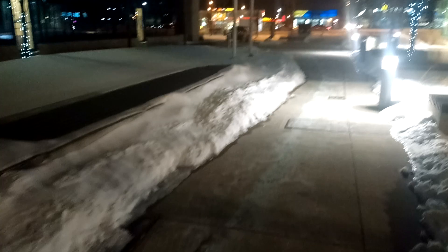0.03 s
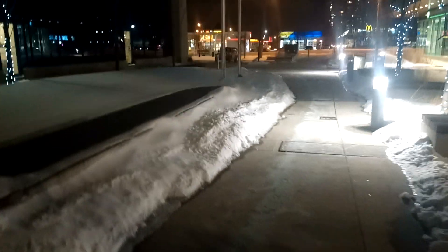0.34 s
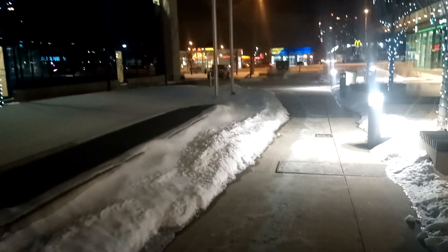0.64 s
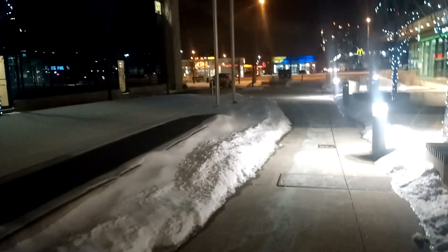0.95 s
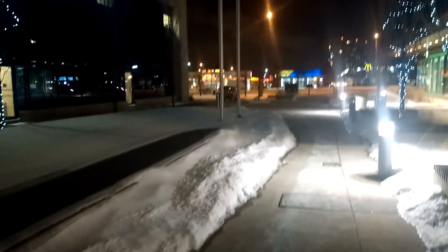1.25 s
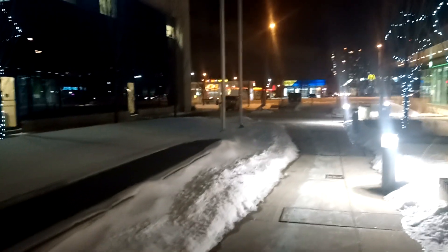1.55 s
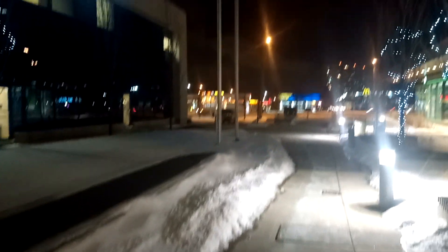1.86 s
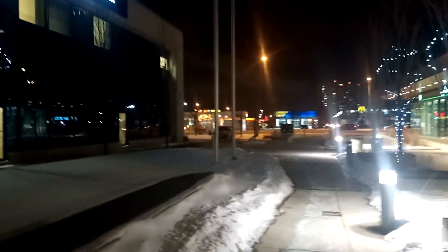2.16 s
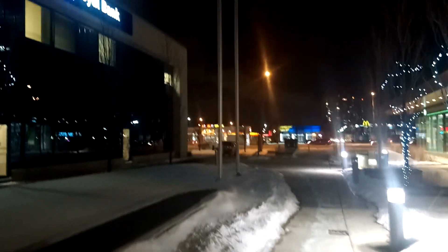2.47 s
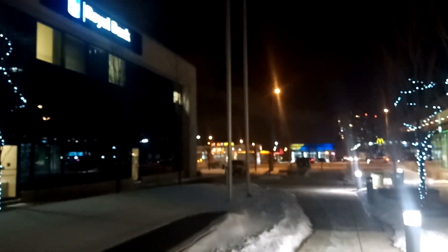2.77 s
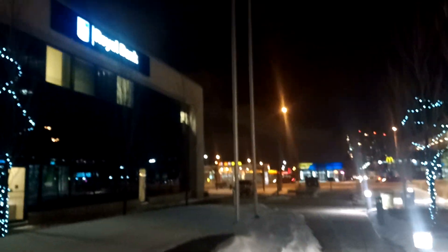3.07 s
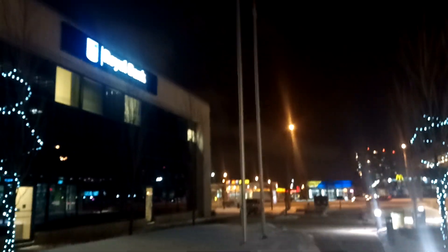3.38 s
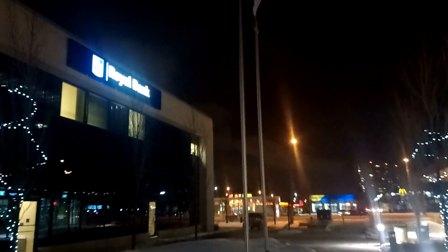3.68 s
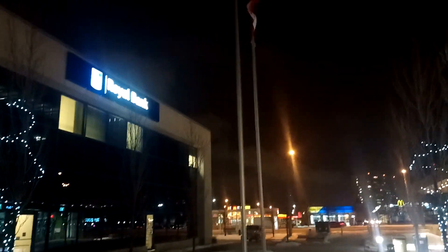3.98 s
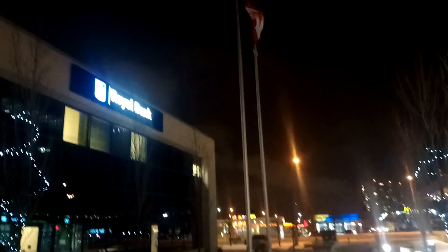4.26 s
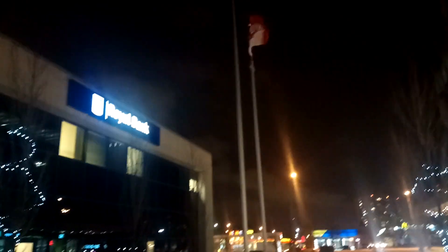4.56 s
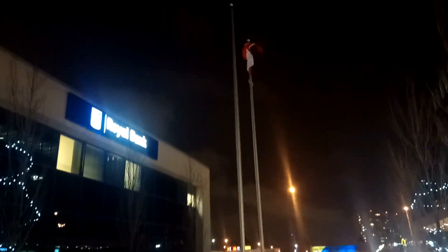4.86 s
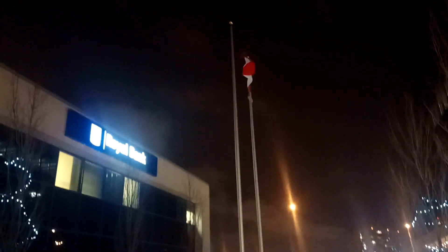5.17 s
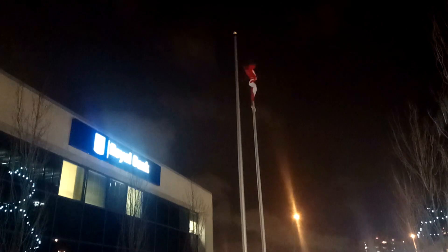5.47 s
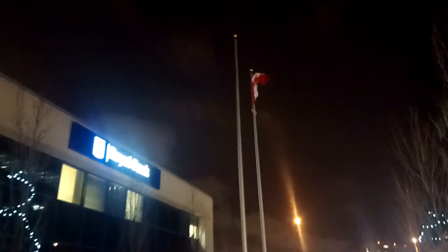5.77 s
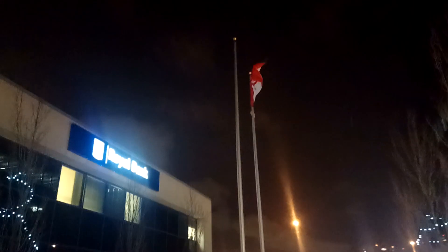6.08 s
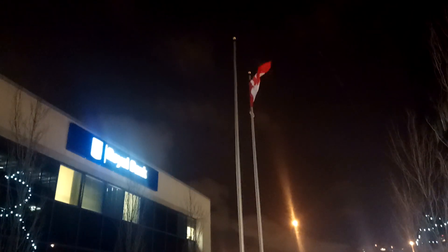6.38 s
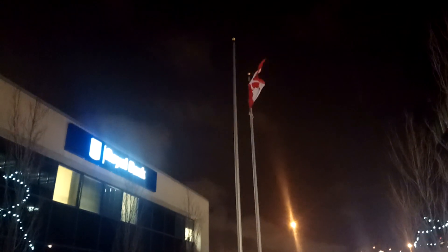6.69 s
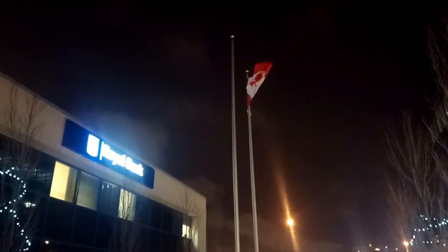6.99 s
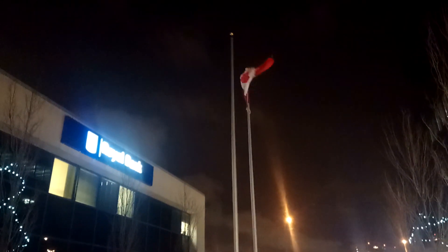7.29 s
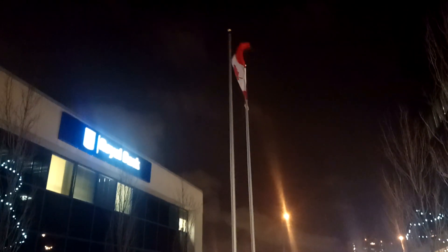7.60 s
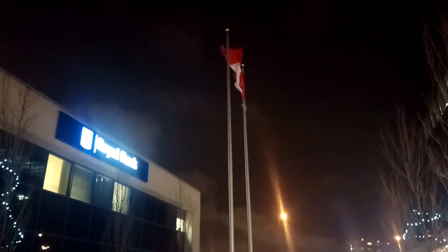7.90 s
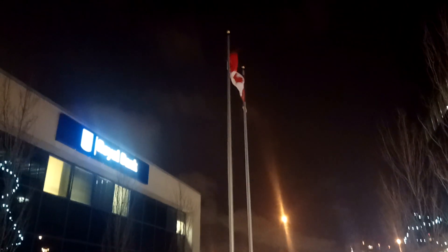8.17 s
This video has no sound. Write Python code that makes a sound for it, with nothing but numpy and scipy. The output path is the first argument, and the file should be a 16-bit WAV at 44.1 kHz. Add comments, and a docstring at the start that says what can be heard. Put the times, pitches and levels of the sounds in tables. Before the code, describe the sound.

A rope slaps rapidly against a hollow metal flagpole with springy clangs, while wind gusts rumble on the microphone over faint traffic.

```python
"""Halyard on a flagpole

On a windy night in a town square, a rope whips a hollow metal pole, swinging almost seven times a second.
It slaps going out and coming back; each slap rasps and sends a short, springy clang along the tube.
Gusts buffet the microphone over distant traffic, a faint whine, one footstep and two stray knocks."""
import sys
import numpy as np
from scipy import signal
from scipy.fft import rfft, irfft, next_fast_len
from scipy.io import wavfile

SR = 44100
rng = np.random.default_rng(int(sys.argv[2]) if len(sys.argv) > 2 else 0)


def wav_record(signal):
    """Record a signal, one row per channel, as 16-bit PCM in the file named by sys.argv[1]."""
    frames = np.transpose(np.atleast_2d(signal))
    bounded = np.clip(frames, -1, 1)
    # unit amplitude maps onto the largest positive 16-bit level
    quanta = np.round(bounded * 32767).astype(np.int16)
    wavfile.write(sys.argv[1], SR, quanta)


N = 372204
TIME = np.arange(N) / SR
FIRST_RETURN_S, SWING_S, RETURN_JITTER_S = .168, .14696, .0006   # the taut rope keeps its own beat
TRAVEL_HZ, BENDING_HZ = 2507, (1504.3, 2963)   # pitch that travel_s refers to; range where speed varies
DETOUR_S, DETOUR_STEP_HZ = .0024, 351   # fittings hurry or hold back each narrow band of the wave

# swings of the rope: start_s, outward_db, return_db
ROPE_SWINGS = [(0.074, 4.5, -2.5), (0.223, 2, 0), (0.37, 2, -0.5), (0.518, 1.5, 3.5), (0.666, 5, 4.5),
               (0.811, 4.5, 4), (0.957, 5.5, 1), (1.104, 4.5, 2.5), (1.25, 5, 3), (1.399, 5, 3),
               (1.546, 3, 5), (1.692, 3.5, 0.5), (1.838, 3.5, -8), (1.985, 6, 0.5), (2.132, 3, 3),
               (2.28, -2.5, 0.5), (2.424, 3, -4), (2.573, -3.5, 2), (2.721, -2, 6), (2.866, 0.5, -2),
               (3.012, -3, -1), (3.16, -2, -4.5), (3.307, -3.5, -7), (3.454, -10, -12), (3.598, -4, -9),
               (3.746, -2.5, -4.5), (3.893, 0, 2.5), (4.04, -2.5, -2.5), (4.189, -2.5, -2.5),
               (4.335, 0.5, 1), (4.482, -4, 0), (4.628, 1.5, 1), (4.777, 4, -7.5), (4.921, -2, -13.5),
               (5.071, 0, 0), (5.218, 3.0, -1), (5.366, -0.5, -5), (5.513, -0.5, 1), (5.659, 1.5, -1),
               (5.806, 2, 0), (5.953, 1.5, 0.5), (6.102, 3, 0.5), (6.248, 2.5, 2.5), (6.397, -1, -25),
               (6.543, 4, 1), (6.692, 5.5, 0.5), (6.837, -2, 2), (6.984, 3, 3.0), (7.131, -3, 1),
               (7.278, -4, 1), (7.426, 4, 0.5), (7.573, 3, -1.5), (7.719, 1.0, 0), (7.865, -5, 1.5),
               (8.014, -5, 2), (8.16, -2.5, 1.5), (8.309, 2, 0)]
# at first the rope comes back a little early: time_s, lead_s
EARLY_RETURN = [(2, .004), (4.5, 0)]
# touches within one slap: offset_s, level_db
SLAP_TOUCHES = [(0, 0.5), (.0044, -4), (0.013, -18), (.032, -10.5)]
# envelopes of the rope laying itself along the pole, out and back: offset_s, level_db
OUT_RASP_SHAPE = [(0, 2), (.01, -0.5), (0.017, 1), (0.036, -5), (.049, 0), (.062, -10), (0.087, -10.5)]
BACK_RASP_SHAPE = [(0, -0.5), (0.022, -9), (.034, -8.5), (0.041, -4), (.058, -5.5), (0.079, -24)]
# envelope of the bright first contact: offset_s, level_db
JINGLE_SHAPE = [(0, -10), (.003, -1), (0.012, -11.5), (0.041, -14)]
# ringing modes of the pole: pitch_hz, level_db, t60_s
POLE_MODES = [(1040, -7, .2), (1431, -6.5, .26), (1572, -10, .2), (1707, -9, .18), (1847, -2.5, .12),
              (1972, -4, .2), (2259, -4, .15), (2302, -2, .18), (2447, -4, .1), (2672, -3, .12),
              (3241, -6, .06), (4130, -6, .05), (5458, -15, .3)]
# short resonances where the rope lands, on every slap and on the return alone: pitch_hz, level_db, t60_s
CLINK_MODES = [(2412, -3.5, 0.06), (3150, -18, 0.028), (4170, -20, 0.03), (5600, -12, 0.041),
               (6470, -19, 0.033)]
RETURN_MODES = [(1280, -14, .012), (1950, -3, 0.014), (2450, 0, .012), (3200, -4, .006), (4250, 1, 0.0045),
                (6450, -12, .012)]
# EQ of the far clang, the near clang and the rasp: pitch_hz, gain_db
FAR_CLANG_EQ = [(500, -25), (1100, -7), (1450, -7), (1850, -1.5), (2300, 2), (2750, -2), (3400, -13),
                (4200, -10), (5000, -24), (6500, -28), (9000, -46)]
NEAR_CLANG_EQ = [(500, -17), (1500, -15.5), (1950, -2), (2400, 5.5), (2750, -3.5), (3400, -7), (4200, -9),
                 (5000, -17), (6500, -25), (9000, -49.5)]
RASP_EQ = [(400, 1.5), (1200, -5), (2300, 0.5), (3000, 4), (4200, 5), (5300, -1), (6600, 3), (7600, -7.5),
           (9500, -21), (12000, -47.5), (13700, -56.5), (15000, -23.5), (16000, -51)]
# echoes off the ground and a facade: delay_s, level_db, right_lag_s
ECHOES = [(.0023, -13, 0.00039), (0.02, -4.5, .00043)]
# wind at the microphone: time_s, level_db
WIND_LEVEL = [(0, -40), (1.45, -42), (1.85, -25.5), (2.2, -18), (2.6, -13), (3.3, -12), (4.7, -16),
              (5.3, -15), (6.5, -17.5), (7.1, -25), (7.6, -50), (8.44, -43)]
# single gusts: centre_s, length_s, left_db, right_db
WIND_GUSTS = [(0.377, 0.14, -25.5, -52), (0.708, 0.32, -25, -35.5), (0.86, 0.22, -20.5, -58),
              (1.253, 0.078, -31, -59), (2.084, 0.091, -28.5, -53), (2.212, 0.059, -33, -26),
              (2.309, 0.077, -18.5, -37), (2.448, 0.11, -37, -32), (5.05, 0.35, -22.5, -40.5),
              (5.36, 0.045, -21, -55), (5.981, 0.058, -24, -48), (6.83, 0.13, -21.5, -54),
              (7.254, 0.19, -25.5, -59)]
# brief drops in the wind: centre_s, length_s, dip_db
WIND_LULLS = [(2.443, 0.14, -7), (2.838, 0.27, -9.5), (4.734, 0.2, -14), (5.195, 0.049, -10.5),
              (6.034, 0.081, -4), (6.75, 0.28, -4.5)]
# knocks outside the rope's rhythm: start_s, level_db
STRAY_KNOCKS = [(2.025, -28), (2.522, -32.5)]
# envelopes of a knock and a shoe's scuff: offset_s, level_db
KNOCK_SHAPE = [(0, 0), (.003, -1), (.007, -11), (.02, -20)]
SCUFF_SHAPE = [(0, -.5), (.038, -2), (.07, -27)]
# EQ of a knock, the scuff and the traffic: pitch_hz, gain_db
KNOCK_EQ = [(400, -1), (1200, -1), (2300, -4), (4200, -3), (6500, -12), (9000, -38), (13000, -53)]
SCUFF_EQ = [(200, -8), (1050, 6.5), (1600, -2), (2500, 4), (5000, -18), (11000, -49)]
TRAFFIC_EQ = [(25, -15.5), (70, 4), (150, 3), (350, -7), (600, 1.5), (950, -4.5), (1900, -1.5),
              (3000, -16.5), (6000, -20), (8500, -40.5), (15000, -50.5)]
# fader curves of the traffic and a far machine: time_s, level_db
TRAFFIC_LEVEL = [(0, -45.5), (.3, -37.5), (1.8, -37.5), (3.3, -44.5), (5.2, -41.5), (7.2, -37), (8.44, -36)]
WHINE_LEVEL = [(4, -63.5), (7, -49)]


def flagpole():
    """The rope strikes and rubs the tube, giving two layers: a clang and a buzz."""
    out_s, out_db, back_s, back_db = slaps()
    out_hits = touches(out_s, out_db - 10.5, jitter_s=.0007, scatter_db=1)
    back_hits = touches(back_s, back_db - 18.5, jitter_s=.0006, scatter_db=1.5)
    hits = out_hits + back_hits
    rub = rasp(out_s, out_db - 46.5, OUT_RASP_SHAPE, grains_per_s=4500, grain_db=4, likeness=.22)
    rub += rasp(back_s, back_db - 45, BACK_RASP_SHAPE, grains_per_s=4000, grain_db=1.5, likeness=.57)
    waves = along_pole(out_hits + .6 * back_hits, travel_s=.0175, smear_t60=.025, smear_db=-7)
    clang = tube_clang(waves, hits, back_hits)
    buzz = colour(rub + from_db(-20) * hits, RASP_EQ)
    buzz += from_db(-41) * tube_ring(.5 * waves + 2.42 * rub)
    buzz += from_db(-10) * jingle(np.r_[out_s, back_s], np.r_[out_db - 46.5, back_db - 48])
    return clang, buzz


def slaps():
    """The rope meets the pole twice a swing: times and accents, out and back."""
    out_s, out_db, back_db = np.transpose(ROPE_SWINGS)
    back_s = FIRST_RETURN_S + SWING_S * np.arange(len(out_s))
    back_s += RETURN_JITTER_S * rng.standard_normal(len(out_s))
    back_s -= np.interp(out_s, *np.transpose(EARLY_RETURN))
    return out_s, out_db, back_s, back_db


def touches(starts, levels_db, jitter_s, scatter_db):
    """Each slap is a few hard touches, never quite alike."""
    after, db = np.transpose(SLAP_TOUCHES)
    chance = rng.standard_normal((len(starts), 2, len(after)))
    at = starts[:, None] + after + jitter_s * chance[:, 0] * np.sqrt(after / after[-1])
    heights = from_db(levels_db[:, None] + db + scatter_db * chance[:, 1])
    out = np.zeros(N)
    np.add.at(out, np.clip((at * SR).astype(int), 0, N - 1), heights * (at < TIME[-1]))
    return out


def rasp(starts, levels_db, shape, grains_per_s, grain_db, likeness):
    """Rough contact, like strands on metal: a chatter of tiny clicks, partly different on each side."""
    after, db = np.transpose(shape)
    stroke = from_db(np.interp(np.arange(int(after[-1] * SR)) / SR, after, db))
    pressure = np.zeros(N)
    for s, level in zip(starts, levels_db):
        part = pressure[max(int(s * SR), 0):][:len(stroke)]
        part += from_db(level) * stroke[:len(part)]
    sizes = rng.choice([-1, 1], (3, N)) * from_db(grain_db * np.minimum(rng.exponential(1, (3, N)), 4))
    shared, *own = (rng.random((3, N)) < grains_per_s / SR) * sizes
    grains = np.sqrt(likeness) * shared + np.sqrt(1 - likeness) * np.array(own)
    return pressure * rms_one(grains * from_db(1.75 * drift(64)))


def along_pole(x, travel_s, smear_t60, smear_db):
    """Bending waves speed up with the root of pitch, so treble lands first; fittings smear each slap."""
    size = next_fast_len(N + SR)
    hz = np.fft.rfftfreq(size, 1 / SR)
    smeared = x + from_db(smear_db) * scatter(x, smear_t60, change_hz=3, channels=1)[0]
    chance = rng.uniform(-.998, 1, size=64)
    detour = DETOUR_S * np.interp(hz / DETOUR_STEP_HZ, np.arange(len(chance)), chance)
    delay = travel_s * np.sqrt(TRAVEL_HZ / np.clip(hz, *BENDING_HZ))
    phase = 2 * np.pi * np.cumsum(delay + detour) * hz[1]
    return irfft(rfft(smeared, size) * np.exp(-1j * phase), size)[:N]


def tube_clang(waves, hits, back_hits):
    """The springy body of the slap narrows and its clinks grow as the listener comes up to the pole."""
    near = np.interp(TIME, [2.1, 4.2], [0, 1])
    body = (1 - near) * colour(waves, FAR_CLANG_EQ) + near * from_db(2.5) * colour(waves, NEAR_CLANG_EQ)
    clink = from_db(-23.5) * (near + .34) * pings(hits + .26 * waves, CLINK_MODES)
    # the return slap lands elsewhere on the tube
    landing = along_pole(back_hits, travel_s=.019, smear_t60=.02, smear_db=-4.5)
    back_clink = from_db(-14 + 2 * near) * pings(landing + .29 * back_hits, RETURN_MODES)
    return body + clink + back_clink


def pings(x, modes):
    """Short resonances, struck by a rope too soft to tick."""
    soft = signal.sosfilt(signal.butter(6, 7200, fs=SR, output="sos"), x)
    return sum(from_db(db) * ring(soft, hz, t60) for hz, db, t60 in modes)


def tube_ring(drive):
    """The pole's modes ring on, each with its own wavering share of the drive."""
    return sum(from_db(db) * ring(drive * from_db(1.7 * drift(2.7)), hz, t60)
               for hz, db, t60 in POLE_MODES)


def ring(x, hz, t60):
    """One mode; a unit click sets a sine of height 1 ringing."""
    r, w = from_db(-60 / (t60 * SR)), 2 * np.pi * hz / SR
    return signal.lfilter([0, np.sin(w)], [1, -2 * r * np.cos(w), r * r], x + 1e-18)


def jingle(starts, levels_db):
    """The bright sizzle of the first graze, heard straight through the air."""
    graze = rasp(starts, levels_db, JINGLE_SHAPE, grains_per_s=3400, grain_db=4, likeness=.45)
    return bandpass(graze, 7500, 11800, order=4)


def square(x, scatter_db, wall_db, t60):
    """Direct sound, slapback from ground and facade, and a thin scattered tail."""
    out = left, right = x * np.ones((2, 1))
    for s, db, lag in ECHOES:
        out = out + from_db(db + wall_db) * np.array([delayed(left, s), delayed(right, s + lag)])
    return out + from_db(scatter_db) * scatter(x, t60, change_hz=1, channels=2)


def scatter(x, t60, change_hz, channels):
    """A dying tail of echoes whose pattern keeps changing as the rope and the listener move."""
    t = TIME[:SR // 3]
    tails = rng.standard_normal((2, channels, len(t))) * from_db(-60 * t / t60)
    tails /= np.linalg.norm(tails, axis=-1, keepdims=True)
    first, second = signal.oaconvolve(np.atleast_2d(x)[None], tails, axes=-1)[..., :N]
    turn = 2 * drift(change_hz)
    return np.cos(turn) * first + np.sin(turn) * second


def wind():
    """Rumble on the microphone's two ports: gusts add to the flow, lulls cut it, the left takes most."""
    flow_db = in_time(WIND_LEVEL) + sum(db * swell(s, length) for s, length, db in WIND_LULLS)
    left, right = from_db(flow_db), from_db(-25 + .77 * flow_db)   # the right port is sheltered
    for s, length, left_db, right_db in WIND_GUSTS:
        left += from_db(left_db) * swell(s, length)
        right += from_db(right_db) * swell(s, length)
    return np.array([
        buffet(left, calm_hz=109.5, gust_hz=190.4, steepness=6.9, lump_db=2.22, low_cut_hz=68.2),
        buffet(right, calm_hz=116, gust_hz=450, steepness=3.9, lump_db=4.5, low_cut_hz=71)])


def buffet(flow, calm_hz, gust_hz, steepness, lump_db, low_cut_hz):
    """Eddies on one port: a stronger flow is louder and sheds smaller, faster eddies, up to a limit."""
    corner_hz = calm_hz + gust_hz * np.tanh((flow / from_db(-14.5)) ** 1.7)
    lumps = from_db(lump_db * drift(70))
    white = rng.standard_normal((2, N))
    edges_hz = 18 * 2 ** np.arange(0, 7.6, .5)   # half-octave bands
    out, power = 0, 0
    for k, (low, high) in enumerate(zip(edges_hz, edges_hz[1:])):
        hz = np.sqrt(low * high)
        low_shelf = .11 + 1 / (1 + (low_cut_hz / hz) ** 6)
        gain = low_shelf / np.sqrt(1 + (hz / corner_hz) ** steepness + (hz / 460) ** 11)
        out += gain * bandpass(white[k % 2], low, high)
        power += gain ** 2 * (high - low) * 2 / SR
    return flow * lumps * out / np.sqrt(power)


def footstep(start_s, level_db):
    """A shoe scuffs the gritty pavement."""
    grit = rasp([start_s], [level_db], SCUFF_SHAPE, grains_per_s=2000, grain_db=.5, likeness=.7)
    return colour(grit, SCUFF_EQ)


def knocks():
    """Dry knocks: a hard attack that dies at once."""
    burst = rasp(*np.transpose(STRAY_KNOCKS), KNOCK_SHAPE, grains_per_s=6000, grain_db=1, likeness=.8)
    return colour(burst, KNOCK_EQ)


def town(likeness, waver_db):
    """A bed of far traffic, leaning left, with a hollow drone at first and a machine's whine later."""
    shared, *own = colour(rng.standard_normal((3, N)), TRAFFIC_EQ)
    from_left = np.array([shared, delayed(shared, .00039)])
    wash = np.sqrt(likeness) * from_left + np.sqrt(1 - likeness) * np.array(own)
    whine = machine_whine(pitch_hz=440.3)
    hollow = rms_one(bandpass(rng.standard_normal(N), 510, 670))
    drone = from_db(-46) * np.interp(TIME, [2, 3], [1, 0]) * hollow
    return wash * from_db(in_time(TRAFFIC_LEVEL) + 2 + waver_db * drift(19)) + whine + drone


def machine_whine(pitch_hz):
    """A far machine holds one faint, wavering tone."""
    gain = from_db(in_time(WHINE_LEVEL) + 2.1 * drift(6.1))
    return gain * np.sin(2 * np.pi * pitch_hz * TIME + .5 * drift(1.2))


def shaded(x, corner_hz, tilt_db, leak_db):
    """The right port faces away and loses most of the top."""
    ratio = np.fft.rfftfreq(N, 1 / SR) / corner_hz
    shelf = from_db(leak_db) + (1 - from_db(leak_db)) / (1 + ratio ** 12)
    return np.array([x[0], irfft(rfft(x[1]) * shelf * from_db(tilt_db * np.sqrt(ratio)), N)])


def colour(x, eq, size=2048):
    """Minimum-phase EQ; white noise keeps its power."""
    hz, db = np.transpose(eq)
    gain = rms_one(from_db(np.interp(np.log(np.fft.rfftfreq(size, 1 / SR) + 1), np.log(hz), db)))
    cepstrum = irfft(np.log(gain))[:size // 2]
    cepstrum[1:] *= 2
    response = irfft(np.exp(rfft(cepstrum, size)))
    return signal.oaconvolve(np.atleast_2d(x), response[None], axes=-1)[:, :N]


def bandpass(x, low_hz, high_hz, order=2):
    """Keep one band."""
    return signal.sosfilt(signal.butter(order, [low_hz, high_hz], "band", fs=SR, output="sos"), x)


def drift(rate_hz):
    """Slow random modulation of unit rms."""
    r = np.exp(-80 * np.pi * rate_hz / SR)   # one step every 40 samples
    slow = signal.lfilter([1], [1, -2 * r, r * r], rng.standard_normal(N // 40 + 2002))[2000:]
    return np.interp(np.arange(N) / 40, np.arange(len(slow)), rms_one(slow))


def swell(centre_s, length_s):
    """A smooth rise and fall of height 1."""
    return np.cos(np.pi * np.clip((TIME - centre_s) / length_s, -.5, .5)) ** 2


def delayed(x, s):
    """The same sound s seconds later."""
    return np.interp(TIME - s, TIME, x, left=0)


def in_time(curve):
    """A fader curve at every sample."""
    return np.interp(TIME, *np.transpose(curve))


def from_db(db):
    """Decibels to gain."""
    return 10 ** (np.asarray(db) / 20)


def rms_one(x):
    """Scale to unit rms."""
    return x / np.sqrt(np.mean(x ** 2) + 1e-20)


def scene():
    """Pole in the square, town behind, wind in front; the long tube spreads buzz wider than clang."""
    clang, buzz = flagpole()
    pole = square(clang, scatter_db=-5, wall_db=-18.5, t60=.18)
    pole += square(from_db(3.5) * buzz, scatter_db=0, wall_db=-4.5, t60=.056)
    air = pole + town(likeness=.64, waver_db=1) + footstep(start_s=.88, level_db=-25.5) + knocks()
    return shaded(air, corner_hz=6100, tilt_db=-2.5, leak_db=-11) + wind()


def record(dry):
    """Fade in, round the peaks, cut the top."""
    fade_db = np.interp(TIME, [.05, .08, .22], [-40, -13.5, 0])
    rounded = .88 * np.tanh(dry * from_db(fade_db) / .88)
    return signal.sosfilt(signal.ellip(10, .1, 80, 15700, fs=SR, output="sos"), rounded)


dry = scene()
out = record(dry)
wav_record(out)
```